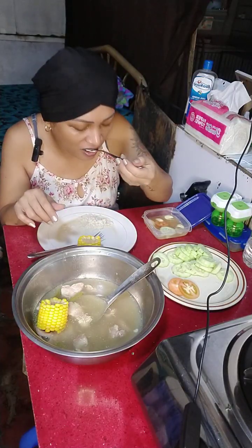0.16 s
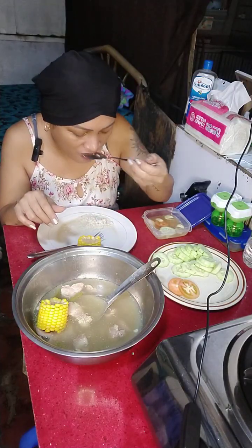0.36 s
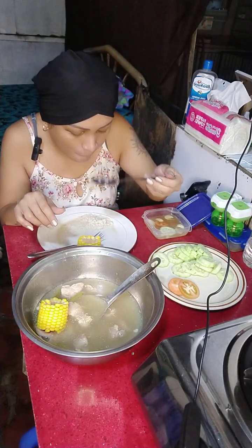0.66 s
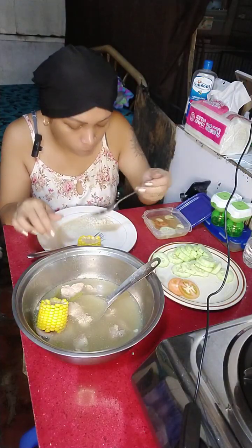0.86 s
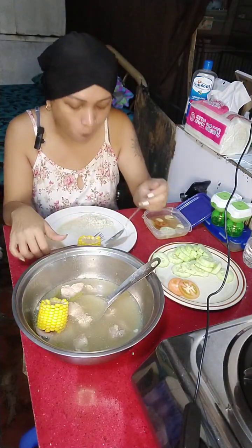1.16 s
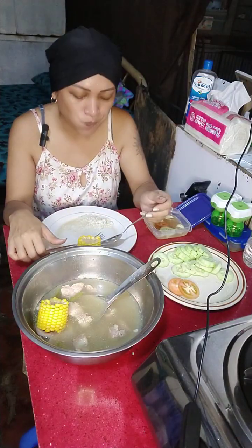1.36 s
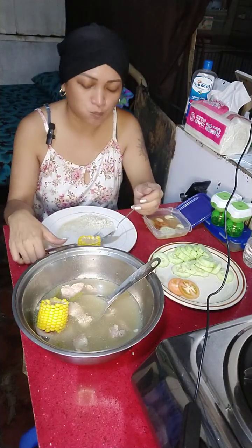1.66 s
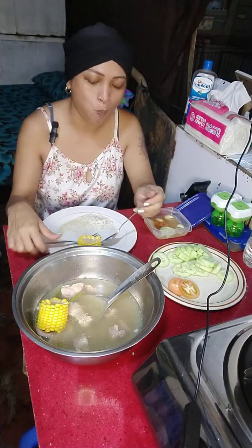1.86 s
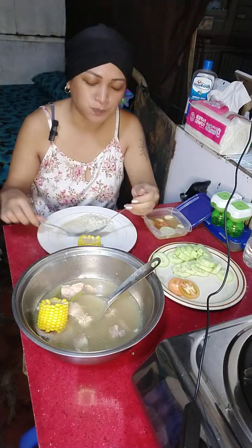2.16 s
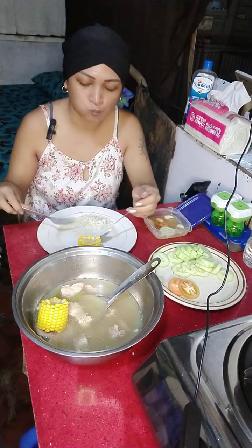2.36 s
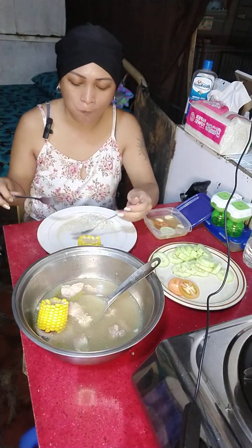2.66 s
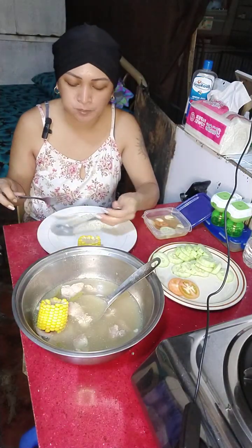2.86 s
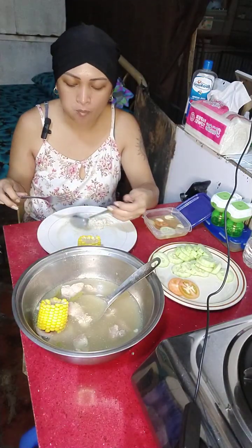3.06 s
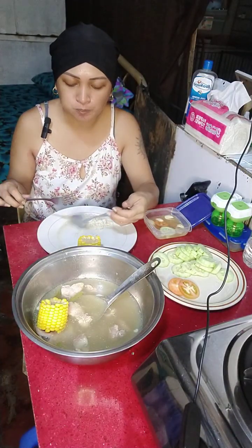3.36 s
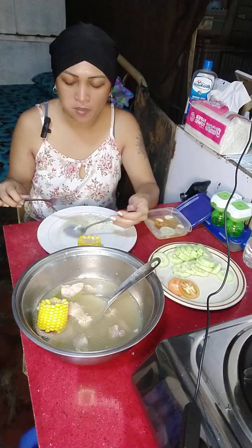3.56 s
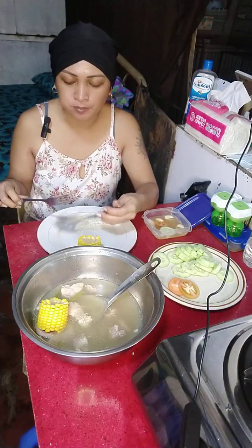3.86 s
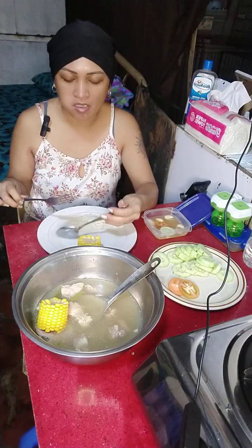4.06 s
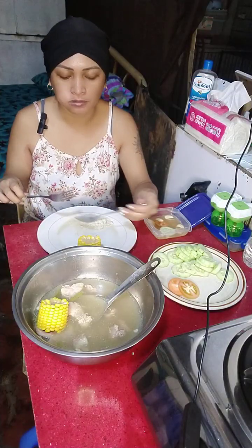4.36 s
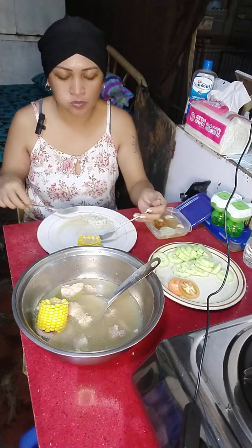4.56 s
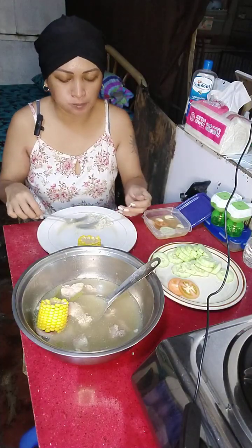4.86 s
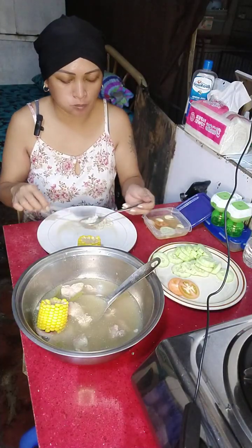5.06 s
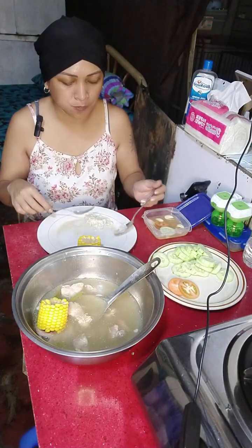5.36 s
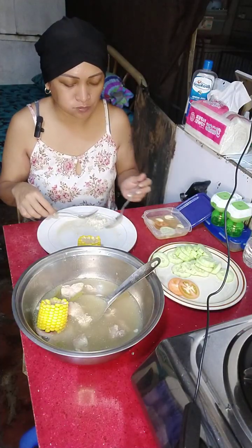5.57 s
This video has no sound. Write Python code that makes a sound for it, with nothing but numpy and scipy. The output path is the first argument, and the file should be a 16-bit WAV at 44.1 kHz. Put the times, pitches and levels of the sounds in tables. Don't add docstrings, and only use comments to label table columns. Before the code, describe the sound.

Mostly hiss for the first second and a half, with two barely audible far thumps. Then a fork rattles quickly against a ceramic plate, faint scrapes follow, and a spoon strikes the rim very loudly just after three seconds. Several separate, shorter clinks come after it. Close, dry sound in a small cluttered room, caught by one small microphone about an arm's length away.

```python
import sys
import numpy as np
from scipy import signal
from scipy.fft import rfft, irfft
from scipy.io import wavfile
from scipy.ndimage import uniform_filter1d

SR = 44100
rng = np.random.default_rng(int(sys.argv[2]) if len(sys.argv) > 2 else 0)


def persist_wave(psi):
    counts = np.round(np.clip(psi, -1, 1) * 32767).astype(np.int16)
    wavfile.write(sys.argv[1], SR, np.atleast_2d(counts).T)


def invert_db(level):
    return 10 ** (np.asarray(level, dtype=float) / 20)


N = 252693

# pitch in Hz, level in dB, decay t60 in seconds.
RIM_FORK = [(436, -11.5, 0.064), (1388, -9, 0.11), (2143, -12, 0.1), (2662, -10.5, 0.11), (3410, -5, 0.085),
            (3545, -0.5, 0.083), (3610, 0, 0.085), (3780, -9, 0.07), (3920, -16, 0.06), (4445, -16, 0.04),
            (4630, -11, 0.065), (2430, -19, 0.085), (6190, -19, 0.09), (905, -17, 0.037)]
TINES = [(905, -12.5, 0.069), (6190, -17, 0.07), (1312, -3.5, 0.044), (1900, -14, 0.04), (2215, -12, 0.04),
         (2662, 3, 0.025), (3070, -10, 0.035), (3410, -1, 0.045), (3545, -1, 0.04), (3780, -12, 0.06),
         (4445, -5, 0.03), (4630, -12, 0.03), (5790, -11, 0.055), (7085, -12, 0.065)]
SLOPE = [(1250, -11, 0.27), (1388, -20, 0.066), (1900, -4, 0.109), (2143, -4, 0.14), (2662, -2, 0.08),
         (3070, -7, 0.15), (3410, -7, 0.081), (3545, -7, 0.16), (3610, -4, 0.061), (3780, -6, 0.084),
         (3920, -19, 0.252), (4445, -12, 0.15), (4630, -2.5, 0.17), (7085, -18, 0.136)]
WELL = [(436, .5, 0.06), (1018, -2.5, 0.046), (1388, -10, .06), (1900, -7.5, .03), (2210, -7, 0.045),
        (3300, -11, .06), (3900, -10, 0.077), (4460, -1, 0.06), (5300, -14, .04)]
FAR_SLOPE = [(1030, -16, 0.049), (1250, -23, 0.11), (3610, -6, 0.045), (2215, -12.5, 0.14),
             (2430, -14, 0.08), (2662, -16, 0.065), (3545, 1.5, 0.049), (3920, -24, 0.055),
             (5370, -23, 0.06), (6190, -27, 0.088), (1388, -20, .05), (4630, -25, .04)]
FAR_BOUNCE = [(2215, -5, 0.13), (2430, -2, 0.061), (2662, -14, 0.15), (3410, -24, 0.072), (3545, -6, 0.052),
              (3610, 3, 0.05), (1900, -18, 0.06), (6190, -15, 0.12)]
RIM_SPOON = [(436, -9, 0.11), (4445, -16, 0.13), (1000, -6, 0.028), (1238, -11, 0.08), (1388, 3, 0.115),
             (2143, -2, 0.035), (2215, 9, 0.08), (2413, 1, 0.045), (2662, -3, 0.07), (3590, 1, 0.04),
             (3610, -1, 0.16), (3060, -9, 0.04), (4630, -13, 0.13), (6190, -18, 0.2)]
NEAR_SLOPE = [(1250, -4, 0.032), (2215, -17, 0.12), (2430, -19, 0.055), (2662, 0, 0.099),
              (3410, -7.5, 0.069), (3545, -17, 0.087), (3610, -12, 0.06), (4445, -13, 0.072),
              (4630, -14, 0.077), (5370, -20, 0.136), (6190, -16.5, 0.087), (810, -17.5, 0.017),
              (1030, -21, 0.03), (1900, -22, .15)]
MIDDLE = [(436, -17.5, 0.14), (905, -19, 0.14), (1030, -10, 0.066), (1312, -9.5, 0.026), (1388, -14, 0.027),
          (2430, 2.5, 0.036), (2662, -8, 0.07), (3410, -22, 0.097), (3545, -15, 0.048), (3610, -12, 0.04),
          (3780, -18, 0.034), (3920, -13, 0.12), (4445, -13, 0.071), (1900, -14, 0.05)]
BOWL_EDGE = [(436, -12.5, 0.064), (905, -14, 0.027), (1030, -7, 0.035), (1250, -9, 0.07), (1388, -5, 0.14),
             (2215, 0.5, 0.115), (2430, 1.5, 0.072), (2662, 3, .085), (3410, -4, 0.09), (3545, -7, 0.09),
             (3610, -10, 0.05), (4445, -11, 0.03), (4630, -14, 0.13), (6190, -8, 0.13)]
BOWL_BACK = [(436, -10, 0.1), (1030, -6, 0.03), (1250, -19, 0.04), (1388, -6, 0.17), (2197, 0, 0.105),
             (2430, -20, 0.28), (2662, -6, 0.15), (3070, -9, 0.04), (3545, -3, 0.095), (3610, -13, 0.23),
             (3920, -13, 0.07), (4445, -5, 0.08), (2143, -10, 0.14), (6190, -4, 0.125)]
FLAT = [(436, -16.5, 0.11), (860, -2, 0.035), (1030, 2.5, 0.035), (1388, 1, 0.07), (1900, -12, 0.11),
        (2215, -12, 0.052), (2430, -8, 0.045), (2662, 5, 0.05), (3780, -5, 0.045), (3545, -9, 0.14),
        (3920, -14, 0.02), (4630, -12.5, 0.068), (5790, -16, 0.1), (6190, -16, 0.06)]
SKIM = [(1030, -4, 0.06), (1390, -7, .05), (2215, -1, 0.15), (2430, -3, .1), (2662, -4, 0.08),
        (3070, -4, .04), (3545, -3, 0.14), (4700, -10, .051)]
TIP = [(1263, -5, 0.027), (2100, -14, .04), (2660, -11.5, .04), (3580, -6, 0.044), (4540, -7, .041)]
SLIDE = [(2215, 1, 0.093), (2520, -8, .06), (2662, -.4, 0.11), (3400, -4.5, .06), (3600, -6, .06),
         (4430, -12, .051)]
REBOUND = [(1900, 1, 0.17), (2430, -18, 0.3), (2662, 2, 0.3), (3545, -14, 0.3), (3610, -22, 0.3),
           (1030, -5, .05), (1388, -14, .04)]
SAUCE = [(690, -3, 0.05), (922, -1.5, 0.07)]
HANDLE = [(3410, -1, .08), (3545, -4, .08), (2215, -10, .08)]
DRIP = [(560, 0, 0.021)]
NUDGE = [(905, -18, .03), (1030, -7, .03), (1298, -8, .04), (1900, -12, .05), (2215, -18, .04),
         (2430, -18, .04), (2662, -6, .03), (3070, -3, .03), (3410, 5, .03), (3545, -3, .03),
         (3780, -8, .04), (3920, -24, .04), (4445, -3, .03), (4630, 3, .03)]
PAT = [(905, -7, .03), (1030, -9, .03), (1388, 0, .035), (1900, -6, .03), (2143, -2, .03), (2662, -9, .03),
       (3545, -16, .03), (4445, -8, .03)]
SCOOP = [(1030, 0, .06), (1235, -7, .3), (1388, -5, .04), (1900, -7, .04), (2430, -1, .05), (2662, 0, .07),
         (3545, -7, .05), (4630, -6, .05)]
WELL_END = [(436, -3, .06), (1030, -5, .04), (1388, -9, .05), (1900, -7, .04), (2143, -5, .05),
            (2662, -12, .04), (3410, -12, .05), (3610, -7, .04), (4445, 0, .025)]
BLOB = [(480, 0, .025)]
RIM_AGAIN = [(436, -30, .03), (1388, -14, .08), (2143, -8, .08), (2662, -13, .09), (3410, 1, .085),
             (3545, 2, .083), (3610, -14, .05), (3780, -16, .04), (2215, -18, .06), (4445, -26, .04),
             (4630, -26, .04), (2430, -22, .07), (6190, -26, .05), (5460, -22, .04)]
NUDGE_END = [(905, -10, .03), (1388, -3, .05), (1250, -14, .02), (1900, -14, .02), (2215, -4, .02),
             (2430, -5, .02), (2662, -7, .09), (2143, -7, .08), (3410, 1, .06), (3610, 1, .06),
             (3780, -8, .06), (3920, -14, .03), (4445, -5, .03), (6190, -18, .05)]
SETTLE = [(2215, -3, .08), (2430, 0, .07), (3920, -8, .05), (3545, -10, .06), (2143, -12, .1),
          (2662, -5, .07), (5460, -16, .05), (3610, -12, .06), (4630, -20, .05), (6190, -22, .04),
          (5790, -18, .06), (3060, -20, .04), (4445, -18, .04), (8560, -26, .04)]
TINKLE = [(2215, -4, .08), (2430, -12, .03), (2143, -12, .05), (3410, -5, .06), (3545, 0, .07),
          (3610, -2, .06), (5460, -14, .03), (6190, -8, .04)]
LATE = [(2215, 0, .09), (2430, -3, .04), (2662, -5, .4), (1388, -8, .25), (3545, -3, .07), (2143, -6, .06),
        (3060, -14, .05), (6190, -12, .06)]


def evened(x):
    return x / np.sqrt(np.mean(x ** 2) + 1e-20)


def coloured(points, size):
    edge_hz = 15680
    f, db = np.transpose(points)
    hz = np.fft.rfftfreq(size, 1 / SR)
    gain = invert_db(np.interp(np.log(hz + 1), np.log(f + 1), db)) * (hz < edge_hz)
    return evened(irfft(rfft(rng.standard_normal(size)) * gain, size))


def wander(shape, smooth):
    drift = uniform_filter1d(rng.standard_normal(shape), smooth)
    return evened(uniform_filter1d(drift, smooth))


def add(mix, s, sound):
    part = mix[round(s * SR):][:len(sound)]
    part += sound[:len(part)]


def contact(modes, db, rise_ms, drag_ms, chatter, clatter_db, wash_db, clatter_t60=0.011, wash_t60=.2, *, smooth=8):
    plate_hz = [432, 480, 560, 700, 800, 860, 905, 940, 1000, 1030, 1238, 1298, 1388, 1900, 2143, 2197,
                2215, 2413, 2432, 2520, 2662, 3060, 3412, 3545, 3590, 3610, 3780, 3920, 4445, 4630, 5370,
                5460, 5790, 6190, 7088, 8560]
    # frequency in Hz, level in dB per Hz.
    clatter = [(350, -64), (750, -19), (1200, -2.5), (2300, -4.5), (3700, 1), (6500, -12), (9500, -24),
               (15500, -33.5)]
    blur, blur_hz = .1, 6000
    t = np.arange(6400) / SR
    swell = np.sin(np.pi / 2 * np.clip(t / (rise_ms / 1000 + 1e-4), 0, 1)) ** 2
    free = np.maximum(t - (rise_ms + drag_ms) / 1000, 0)

    hz, mode_db, t60 = np.transpose(modes)[:, :, None]
    nearest = abs(hz - plate_hz).argmin(axis=1)
    hz = np.take(plate_hz, nearest)[:, None]
    turn = np.exp(2j * np.pi * (hz * t + rng.random(hz.shape)))

    shake = wander((len(hz), 400), smooth) + 1j * wander((len(hz), 400), smooth)
    shake = uniform_filter1d(np.repeat(shake, 16, axis=1), size=16)
    shake = shake * (chatter + blur * (hz / blur_hz) ** 3)
    shake = shake * np.minimum(hz / 2200, 1)
    shake = shake * invert_db(-60 * free / 1.2)

    lines = (turn * (1 + shake)).real
    lines = lines * np.sin(np.pi / 2 * np.minimum(hz * t / 2.54, 1)) ** 2
    ring = invert_db(mode_db - 60 * free / np.clip(t60, .02, .5))
    tone = swell * (lines * ring).sum(0)

    crowd = swell * (invert_db(clatter_db - 60 * free / clatter_t60) + invert_db(wash_db - 60 * free / wash_t60))
    fade_out = np.minimum((t[-1] - t) / .03, 1)
    return invert_db(db) * fade_out * (tone / abs(tone).max() + .3 * crowd * coloured(clatter, len(t)))


def cutlery():
    # modes, chatter share 0-1, clatter in dB and wash in dB
    # under the ring, level of the steel in dB.
    spots = dict( rim_fork=(RIM_FORK, .2, -16, -20, -28), tines=(TINES, .5, -17, -21, -30),
             slope=(SLOPE, .7, -11, -8, -26), tip=(TIP, .02, -14, -23, -40), well=(WELL, .55, -6, -13, -40),
             skim=(SKIM, .3, -5, -16, -40), far_slope=(FAR_SLOPE, .15, -16, -22, -33),
             far_bounce=(FAR_BOUNCE, .2, -14, -18, -28), slide=(SLIDE, .35, -15, -22, -40),
             rim_spoon=(RIM_SPOON, .2, -5, -17, -24), near_slope=(NEAR_SLOPE, .05, -15, -22, -35),
             middle=(MIDDLE, .42, -8.5, -19, -30), bowl_edge=(BOWL_EDGE, .2, -8.5, -15, -15),
             bowl_back=(BOWL_BACK, .28, -7.5, -16, -25), flat=(FLAT, .3, -10, -19, -30),
             rebound=(REBOUND, .2, -8, -19, -40), handle=(HANDLE, .8, -25, -34, -40),
             drip=(DRIP, .4, -26, -35, -50), sauce=(SAUCE, .02, -20.5, -30, -50),
             nudge=(NUDGE, .6, -12, -18, -40), pat=(PAT, .2, -8, -20, -50), scoop=(SCOOP, .4, -8, -16, -40),
             well_end=(WELL_END, .5, -8, -13, -40), blob=(BLOB, .2, -26, -35, -50),
             rim_again=(RIM_AGAIN, .15, -20, -24, -32), nudge_end=(NUDGE_END, .4, -14, -24, -40),
             settle=(SETTLE, .2, -14, -22, -40), late=(LATE, .1, -18, -24, -45),
             tinkle=(TINKLE, .15, -16, -22, -40), drip_low=([(432, 0, .04)], .1, -30, -40, -60),
             lip=([(1238, 0, .03)], .1, -24, -35, -60))
    # pitch in Hz, level in dB, decay t60 in seconds.
    steel = [(3070, -3, .19), (3780, -4, .2), (3920, 1.5, .28), (5370, -5, .17), (5460, -1, .17),
             (5790, -10, .2), (7085, -10, .13), (8560, -6, .12)]
    # spot, start in seconds, peak in dB, rise in ms, drag in ms.
    blows = [("rim_fork", 1.637, -24, 1.4, .1), ("rim_fork", 1.6402, -11.5, 1.6, .1),
             ("rim_again", 1.651, -15.5, 3.0, 2), ("nudge", 1.718, -17, 3.0, 8.0),
             ("tines", 1.7255, -6, 6, 9), ("nudge_end", 1.743, -14, 4, 9), ("slope", 1.7765, -19, 1.2, 2.1),
             ("far_slope", 3.014, -15.5, 11.4, 3.5), ("far_bounce", 3.062, -22, 4.8, 5.2),
             ("rim_spoon", 3.2947, .5, .85, 2.1), ("rim_spoon", 3.2975, -10.5, .55, 1.2),
             ("near_slope", 3.806, -13.5, 5.3, 3.5), ("middle", 3.903, -18.5, 3.2, 3.1),
             ("bowl_edge", 4.146, -16, 7, 3.0), ("bowl_edge", 4.1515, -6, 4.5, 7),
             ("bowl_back", 4.7062, -8.5, .85, 4.6), ("bowl_back", 4.7124, -15.5, 3, .1),
             ("flat", 5.4427, -9, .99, 3.4)]
    # spot, start in seconds, peak in dB, rise in ms, drag in ms.
    grazes = [("slope", 1.925, -34.5, 2.1, 9.4), ("tip", 2.008, -33.5, 1.5, 2.7),
              ("well", 2.064, -35.5, 1.5, 20), ("well_end", 2.096, -35, 2.3, 30),
              ("pat", 2.426, -38.5, 2.7, 3.0), ("skim", 2.859, -33.5, 1.5, 6),
              ("scoop", 2.960, -36, 1.9, 6), ("far_slope", 3.048, -34, 4.4, 3.0),
              ("drip", 3.088, -45.5, 7.3, 3.0), ("slide", 3.412, -35, 8.0, 36),
              ("near_slope", 3.795, -32.5, 2.3, 6.1), ("slide", 4.290, -41, 8., 16),
              ("tinkle", 4.320, -33, 2.5, 9), ("handle", 4.770, -39, 7.5, 57),
              ("handle", 4.845, -46, 4.0, 13), ("slide", 4.870, -40.5, 3.8, 16),
              ("rebound", 5.478, -30, 4.6, 6.2), ("sauce", 5.581, -41, 11, 6),
              ("handle", 2.526, -45, 4.0, 22), ("blob", 2.551, -48, 5, 3), ("skim", 2.880, -39, 3, 10),
              ("well", 2.117, -39, 3, 10), ("late", 3.345, -32, 10, 18), ("settle", 4.198, -32, 5, 8),
              ("pat", 3.287, -38, 4, 3), ("pat", 1.713, -36, 4, 3), ("rebound", 3.884, -42, 4, 8),
              ("drip_low", 4.745, -41, 4, 5), ("lip", 4.259, -50, 3, 8), ("lip", 5.462, -38, 4, 8),
              ("slide", 4.276, -46, 4, 6)]
    # start in seconds, level in dB, decay t60 in seconds.
    ticks = [
        (3.2953, -22, .01),
        (4.152, -41, .07),
        (4.7062, -38, .05),
        (1.641, -44, .06),
        (5.4427, -43, .02),
        (1.730, -40, .06),
        (3.2975, -25, .012),
        (3.809, -46, .04),
    ]
    # start in seconds, level in dB, pitch in Hz.
    thuds = [
        (1.73, -53, 50),
        (2.0, -52, 111),
        (3.03, -55, 60),
        (3.2955, -19, 1650),
        (3.2958, -21, 790),
        (3.296, -20, 970),
        (4.15, -58, 60.5),
        (4.152, -34, 900),
        (5.45, -59, 60),
    ]
    out, t = np.zeros(N), np.arange(5000) / SR
    for spot, s, db, rise_ms, drag_ms in blows + grazes:
        modes, *feel, steel_db = spots[spot]
        steel_modes = [(hz, steel_db + level, t60) for hz, level, t60 in steel]
        add(out, s, contact(modes + steel_modes, db, rise_ms, drag_ms, *feel))
    out = plate_colour(out)
    for s, db, t60 in ticks:
        bright = coloured([(1500, -32), (5000, -23), (9000, 7), (15600, 1)], len(t))
        add(out, s, invert_db(db - 60 * t / t60) * np.minimum(t / .0005, 1) * bright)
    for s, db, hz in thuds:
        onset = np.sin(np.pi / 2 * np.minimum(t * hz / 1.3, 1)) ** 2
        add(out, s, invert_db(db - 60 * t * hz / 13.0) * onset * np.sin(2 * np.pi * hz * t))
    return out


def plate_colour(x, low_hz=330):
    # middle in Hz, width in Hz, depth in dB.
    gaps = [(700, 70, -5), (1650, 90, -5), (5050, 150, -3)]
    hz = np.fft.rfftfreq(4096, 1 / SR)
    gap_db = sum(db * np.exp(-((hz - mid_hz) / width) ** 2) for mid_hz, width, db in gaps)
    log_gain = np.log(invert_db(gap_db))
    circle = np.concatenate([log_gain, log_gain[-2:0:-1]])
    taps = np.fft.ifft(np.exp(np.conj(signal.hilbert(circle)))).real
    low_cut = signal.butter(4, low_hz, "high", fs=SR, output="sos")
    return signal.sosfilt(low_cut, signal.oaconvolve(x, taps)[:N])


def dip_bands(x, ease_s=.004):
    # start in seconds, low edge in Hz, high edge in Hz, length in seconds,
    # gain in dB.
    band_dips = [(1.657, 300, 1100, .04, -12), (1.686, 1100, 4800, .025, -12), (1.758, 800, 2550, .015, -12),
                 (3.338, 300, 700, .05, -10), (3.358, 1150, 1600, .02, -8), (3.838, 2900, 3500, .03, -8),
                 (3.918, 800, 1150, .03, -10), (4.203, 900, 2000, .05, -22), (4.212, 3000, 3500, .04, -12),
                 (4.226, 3700, 4100, .04, -15), (4.740, 300, 600, .006, -12), (4.757, 300, 600, .05, -20),
                 (4.773, 1150, 1600, .05, -15), (5.476, 700, 1600, .004, -10)]
    hz, t, z = signal.stft(x, SR, nperseg=512, noverlap=384)
    gain_db = np.zeros(z.shape)
    for s, low, high, length, db in band_dips:
        held = np.clip(np.minimum(t - s, s + length - t) / ease_s + 1, 0, 1)
        gain_db += db * np.outer((hz > low) & (hz < high), held)
    return signal.istft(z * invert_db(gain_db), SR, nperseg=512, noverlap=384)[1][:N]


def room(x, wet_db=-19, t60=0.18):
    t = np.arange(6000) / SR
    tail = rng.standard_normal(len(t)) * invert_db(-60 * t / t60) * (t > .003)
    return x + invert_db(wet_db) * signal.fftconvolve(x, tail / np.linalg.norm(tail))[:N]


def rumble(hz=55.3, sway_hz=3.5):
    # peak time in seconds, level in dB.
    steps = [
        (.195, -59),
        (.37, -60),
    ]
    swell_db_per_s, fade_db_per_s = 250, 95
    t = np.arange(N) / SR
    low = np.sin(2 * np.pi * np.cumsum(hz + sway_hz * wander(N, 2500)) / SR)
    level = sum(invert_db(db + np.minimum(swell_db_per_s * (t - s), fade_db_per_s * (s - t))) for s, db in steps)
    return np.sqrt(2) * low * level


def scene():
    return np.tile(dip_bands(room(cutlery())) + rumble(), (2, 1))


def suppress(x, floor_db=-69.5, depth_db=-25, steep=1.1):
    hz, t, z = signal.stft(x, SR, nperseg=882, noverlap=441)
    power = uniform_filter1d(abs(z) ** 2, size=7, axis=0)
    above_floor = np.maximum(1 - invert_db(2 * floor_db) / (power + 1e-20), 0)
    keep = np.clip(above_floor ** steep, invert_db(depth_db), 1)
    keep[:3] = 1
    return signal.istft(z * keep, nperseg=882, noverlap=441)[1][:N]


def hiss(level_db=-46.5, flicker_db=0.24):
    # frequency in Hz, level in dB per Hz.
    colour = [(20, -37), (40, -20), (56, -7), (400, -7), (3000, -7), (5600, -5), (9000, -2.5), (15500, 0.2)]
    return invert_db(level_db + flicker_db * wander(N, 300)) * coloured(colour, N)


def stray(count=30, db=-57.5, width_hz=1000):
    out, window = np.zeros(N), np.hanning(2048)
    for when, where in rng.random((count, 2)):
        low_hz = 4500 + 10000 * where
        high_hz = low_hz + width_hz
        band = [(low_hz - 20, -90), (low_hz, 0), (high_hz, 0), (high_hz + 20, -90)]
        start = 647 + 1024 * int(when * (N // 1024 - 2))
        add(out, start / SR, invert_db(db) * window * coloured(band, 2048))
    return out


def low_pass(x):
    return signal.sosfilt(signal.butter(12, 16400, fs=SR, output="sos"), x)


def record(dry):
    x = signal.sosfilt(signal.butter(3, 50, "high", fs=SR, output="sos"), dry[0])
    x = suppress(x) + hiss()
    power_db = 10 * np.log10(abs(uniform_filter1d(x ** 2, 400)) + 1e-12)
    fall = np.arange(N) * 19.0 / SR
    held_db = np.maximum.accumulate(power_db + fall) - fall
    over_db = np.maximum(held_db + 15, 0)
    x = x / invert_db(0.33 * uniform_filter1d(over_db, 400))
    x = 1.2 * np.tanh(x / 1.2)
    side = stray()
    return low_pass(np.array([x + side, x - side]))


dry = scene()
out = record(dry)
persist_wave(out)
```